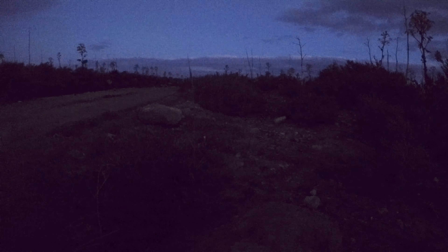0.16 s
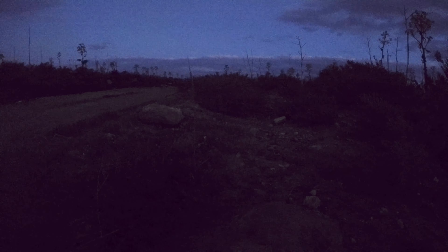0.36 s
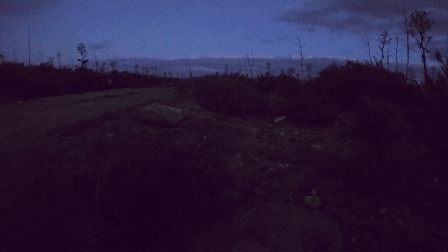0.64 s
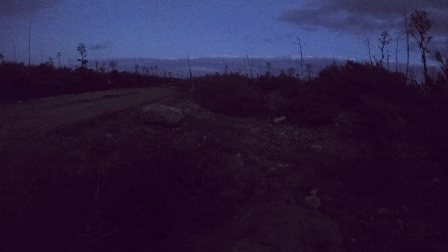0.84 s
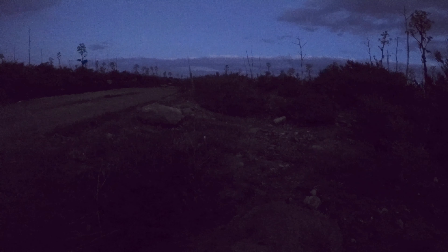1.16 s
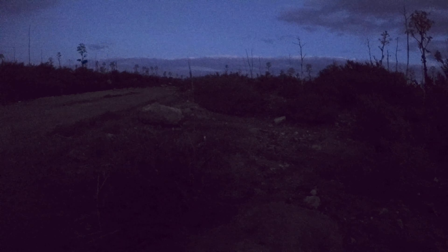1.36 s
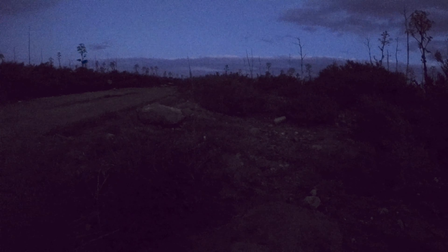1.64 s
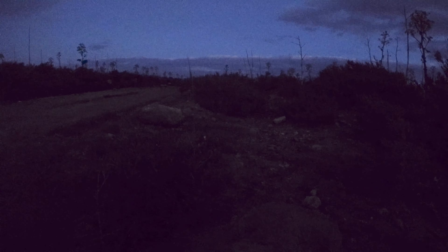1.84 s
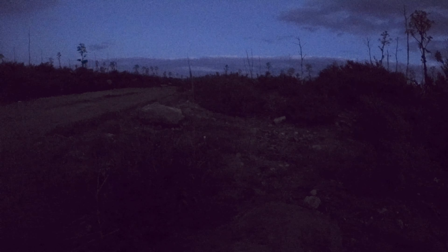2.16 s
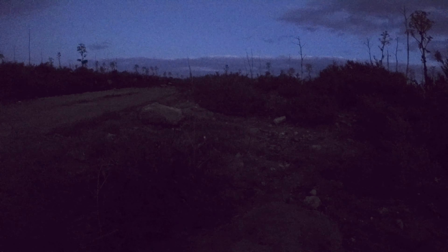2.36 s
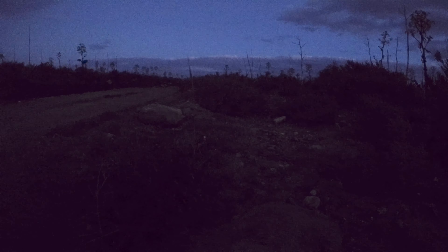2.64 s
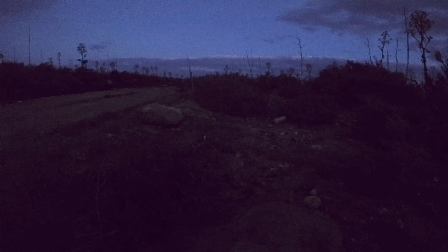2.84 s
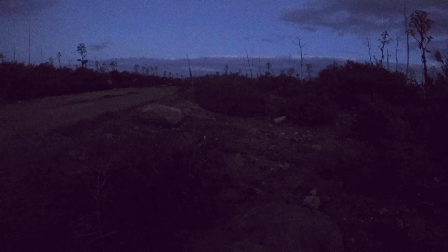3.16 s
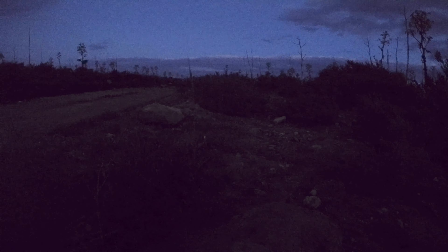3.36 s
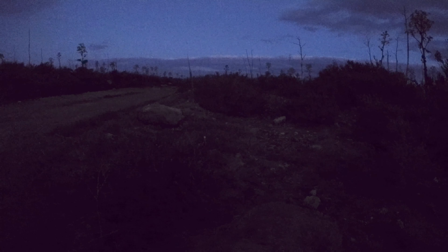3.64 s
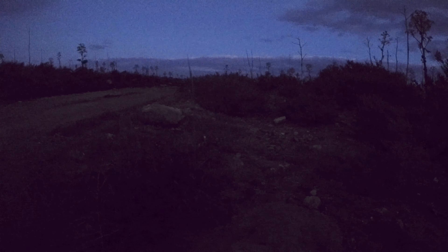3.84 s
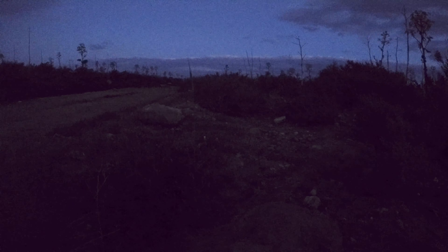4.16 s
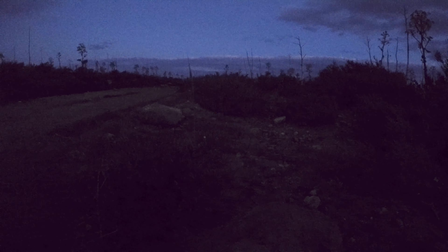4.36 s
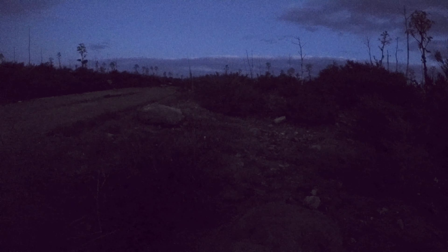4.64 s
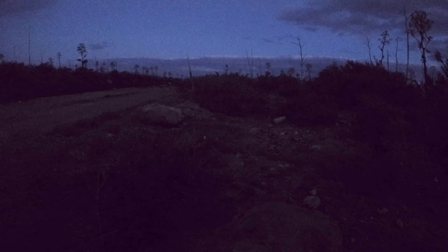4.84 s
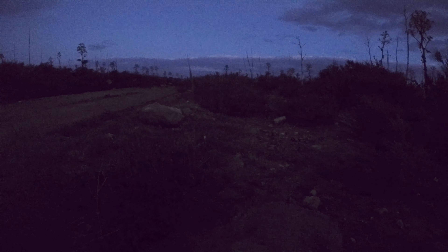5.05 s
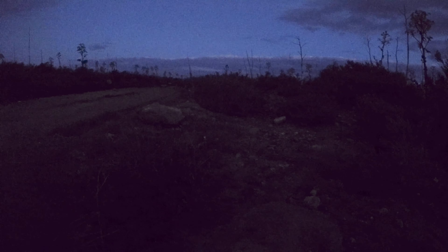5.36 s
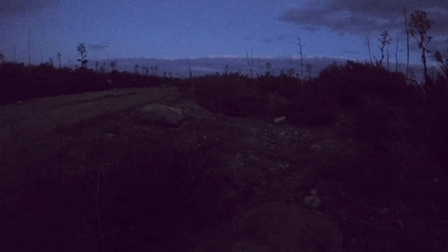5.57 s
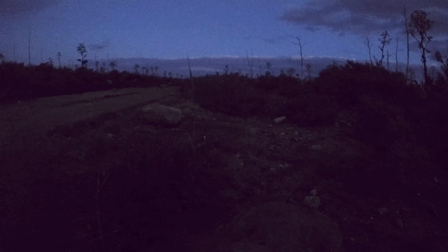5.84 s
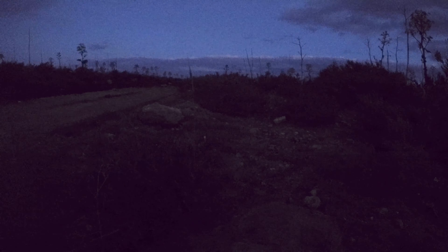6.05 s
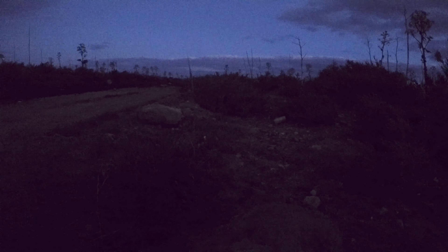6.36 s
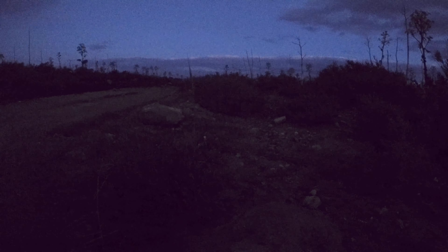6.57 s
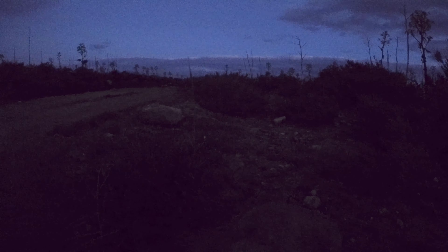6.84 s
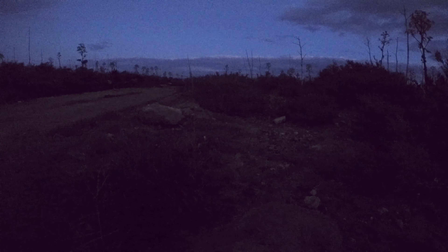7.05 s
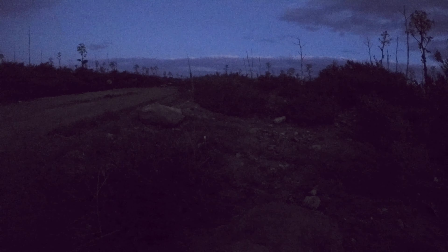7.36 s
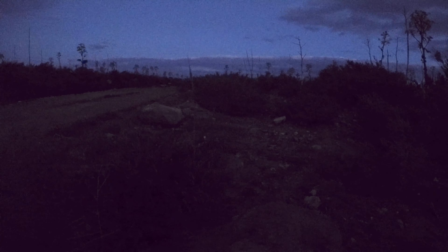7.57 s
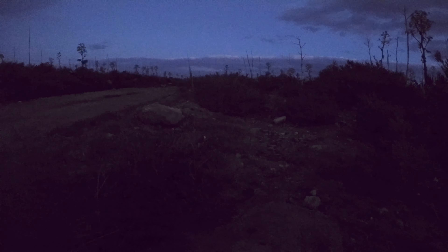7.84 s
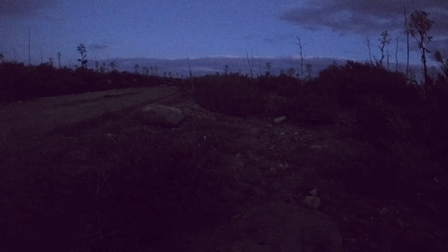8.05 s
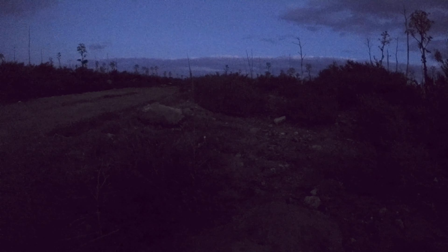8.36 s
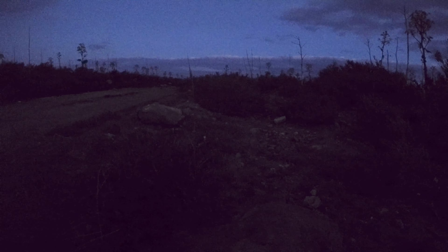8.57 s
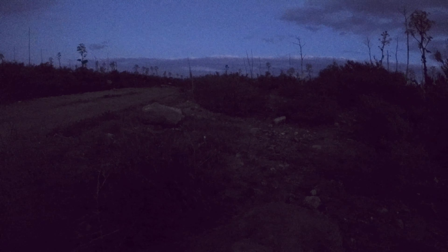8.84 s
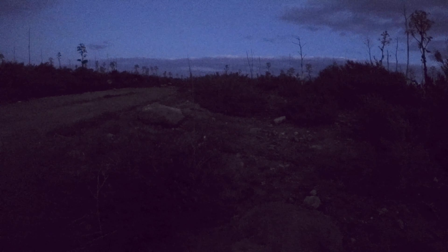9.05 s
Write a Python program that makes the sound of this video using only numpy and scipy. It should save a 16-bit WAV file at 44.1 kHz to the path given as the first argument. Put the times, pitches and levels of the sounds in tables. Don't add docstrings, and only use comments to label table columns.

```python
import sys
import numpy as np
from scipy import signal
from scipy.fft import rfft, irfft, next_fast_len
from scipy.io import wavfile
from scipy.ndimage import uniform_filter1d, minimum_filter1d

SR = 44100
rng = np.random.default_rng(int(sys.argv[2]) if len(sys.argv) > 2 else 0)


def amplitude_ratio(level_db):
    exponent = np.asarray(level_db, float) / 20
    return 10 ** exponent


def unload_audio(sound):
    columns = np.transpose(np.atleast_2d(sound))
    steps = np.round(np.clip(columns, -1, 1) * 32767)
    wavfile.write(sys.argv[1], SR, steps.astype(np.int16))


N = 405713


def evened(x):
    return x / np.sqrt(np.mean(x ** 2) + 1e-20)


def add(mix, s, sound):
    part = mix[..., round(s * SR):][..., :sound.shape[-1]]
    part += sound[..., :part.shape[-1]]


def curve(rows, t):
    s, *columns = np.transpose(rows)
    return [np.interp(t, s, c) for c in columns]


def resonate(x, hz, width):
    turn = np.exp(2j * np.pi * np.cumsum(hz * np.ones(len(x))) / SR)
    r = np.exp(-np.pi * width / SR)
    return 2 * (turn * signal.lfilter([1 - r], [1, -r], x / turn)).real


def ring(x, modes, order=2):
    size = next_fast_len(len(x) + 8192)
    hz = np.fft.rfftfreq(size, 1 / SR)
    gain = np.zeros((2, len(hz)), complex)
    for k, (mode_hz, width, db, side_db, phase) in enumerate(modes):
        shape = (-1) ** k * amplitude_ratio(db) / (1 + 2j * (hz - mode_hz) / width) ** order
        left, right = amplitude_ratio(side_db / 2), amplitude_ratio(-side_db / 2) * np.exp(1j * phase)
        gain += shape * np.array([[left], [right]])
    return irfft(rfft(x, size) * gain, size)[:, :len(x)]


STROKE_DB = -19


def swells(tops, level_db, rise, fall):
    t = np.arange(0, N / SR + .01, .002)
    late = t - np.reshape(tops, (-1, 1))
    away = np.maximum(late / np.reshape(fall, (-1, 1)), -late / np.reshape(rise, (-1, 1)))
    db = np.reshape(level_db, (-1, 1)) + STROKE_DB * away
    return np.interp(np.arange(N) / SR, t, np.sqrt((amplitude_ratio(db) ** 2).sum(0)))


# (mode_hz, width_hz, level_db, left_right_db, right_phase_rad)
RUB_MODES = [(358, 1100, -30, -1, 3.15), (593, 170, -0.5, -10.5, 2.27), (765.6, 73, -2.5, -9.5, 3.2),
             (850, 156, 4.5, -4, 3.38), (1130, 404, -3.5, -1, 3.78), (1355, 118, 1.5, -1, 3.826),
             (1460, 210, -5, 0.5, 4.15), (1970, 240, -21, -2.5, 3.89), (734.4, 25.6, -3.5, -5, 3)]
OPEN_HZ, RASP_PER_OCTAVE_DB = 1330, 14
RASP_RISE_S = .005
BARE_DB, BARE_SIDE_DB, BARE_PHASE = -17, -8.5, 1.95


def note(rows, arch, rough, rasp_bands, tail_ring_db=0):
    t = np.arange(rows[0][0], rows[-1][0], 1 / SR)
    effort_db, peak_hz = curve(rows, t)

    start_hz, top_hz, top, end_hz, rasp_db = arch
    u = np.linspace(0, 1, len(t))
    rise, fall = np.clip(u / top, 0, 1), np.clip((u - top) / (1 - top), 0, 1)
    hz = start_hz + (top_hz - start_hz) * np.sin(np.pi / 2 * rise) ** 2
    hz = hz - (top_hz - end_hz) * fall ** 0.71
    rough = np.minimum(rough * (1.8 - 1.55 * fall ** .4), 1)
    wobble = evened(uniform_filter1d(rng.standard_normal(len(t)), 150))
    turns = np.cumsum(hz * (1 + .16 * rough * wobble)) / SR

    pulses = sum(np.cos(2 * np.pi * k * turns) for k in range(1, 6))
    pulses = pulses - .55 * np.cos(2 * np.pi * turns)
    puffs = (0.32 + np.exp(-(turns % 1) / 0.3)) * rng.standard_normal(len(t))
    drive = (1 - rough) * evened(pulses) + 5 * rough * evened(puffs)
    drive = amplitude_ratio(-25.5) * drive + resonate(drive, peak_hz, 175)
    edge = np.clip(np.minimum(t - t[0], t[-1] - t) / .014, 0, 1) ** 1.4
    snap = np.clip(np.minimum((t - t[0] - .003) / RASP_RISE_S, (t[-1] - t) / 0.022), 0, 1)

    upper = np.array(rasp_bands)
    upper[:, 0] *= rng.uniform(.975, 1.025, len(rasp_bands))
    body, hoarse = np.array(RUB_MODES), rough.max() ** 4
    body[[1, -2], 2] += np.array([-2.0, 5.0]) * hoarse
    body[-1, 2] += tail_ring_db

    rub, rasp = ring(drive, body), ring(puffs, upper)
    drive *= amplitude_ratio(effort_db) / np.sqrt(uniform_filter1d(rub.mean(0) ** 2, 900) + 1e-9)
    mouth_db = RASP_PER_OCTAVE_DB * np.log2(peak_hz / OPEN_HZ)
    pitch_db = 8.4 * np.log2(np.where(fall > 0, hz / top_hz, 1))
    puffs *= amplitude_ratio(effort_db + rasp_db + mouth_db + pitch_db) / rasp.mean(0).std()

    tail = np.zeros(3600)
    bare = np.cos(2 * np.pi * turns + np.array([[0], [BARE_PHASE]]))
    bare = amplitude_ratio(effort_db + BARE_DB) * np.sqrt(fall) * (1 - rough) ** 2 * edge * bare
    bare = bare * amplitude_ratio(np.array([[BARE_SIDE_DB], [-BARE_SIDE_DB]]) / 2)
    bare = np.c_[bare, np.zeros((2, len(tail)))]
    return bare + ring(np.r_[drive * edge, tail], body) + ring(np.r_[puffs * snap, tail], upper)


# (time_s, rasp_re_effort_db)
RASPING = [(0, -19), (.5, -30), (1.1, -22), (1.5, -22), (2.6, -17.5), (4.2, -19)]
PIP_DB = -5
START_HZ, TOP_HZ, END_HZ = 435.6, 564.5, 299.4
FALL_S = .058
SHUT_HZ, OPENING_S = 780, 0.0285
RELEASE_S, PUSH_GAP_S = .02, .04
END_DB = -15.5
STRAIN_S, HOARSE_ROUGH = .095, .55


def call(start, length, effort_db, top, open_hz, rough, end_hz, extra_db, closing, rasp_bands, push):
    start_db, sag_db, last_db, tail_ring_db = push
    top = np.clip(top, .05, .9)
    top_s, end_s = start + top * length, start + length
    run_up = min(top * length / OPENING_S, 1)
    rows = [(start, effort_db + start_db * run_up, SHUT_HZ)]
    if top * length > 2 * OPENING_S:
        rows += [(top_s - OPENING_S, effort_db + start_db, SHUT_HZ)]
    rows += [(top_s, effort_db, open_hz)]
    last_s, narrow = end_s - RELEASE_S, open_hz - closing * (open_hz - SHUT_HZ)
    if last_s - top_s > PUSH_GAP_S:
        rows += [(last_s - PUSH_GAP_S / 2, effort_db + sag_db, narrow)]
        rows += [(last_s, effort_db + last_db, open_hz)]
    rows += [(end_s, effort_db + END_DB, narrow)]
    rasp_db = curve(RASPING, start)[0] + PIP_DB * (1 - run_up) + extra_db
    arch = START_HZ, TOP_HZ, max(top, 1 - FALL_S / length), end_hz, rasp_db
    rough = min(rough * max(length / STRAIN_S, 1), HOARSE_ROUGH)
    return start - .006, note(rows, arch, rough, rasp_bands, tail_ring_db)


# (start_s, length_s, effort_db, share_before_top, top_resonance_hz)
NOTES = [(0.686, .12, -20, 0.14, 1396), (0.937, 0.073, -18.5, 0.29, 1515), (1.114, 0.08, -19.5, 0.28, 1400),
         (1.226, 0.083, -18, 0.52, 1300), (1.428, 0.084, -18, 0.36, 1464),
         (1.606, 0.086, -19.5, 0.33, 1230), (1.725, 0.11, -16, 0.66, 1286),
         (1.959, 0.089, -19.5, 0.3, 1355), (2.144, 0.064, -17.5, 0.44, 1250), (2.27, 0.051, -19, 0.16, 830),
         (2.329, 0.13, -19, 0.53, 1163), (2.578, 0.099, -21, 0.21, 1300), (2.785, 0.064, -17.5, 0.41, 1080),
         (2.904, 0.047, -18.5, 0.1, 830), (2.959, 0.17, -19.5, 0.8, 1154),
         (3.261, 0.094, -18.5, 0.31, 1300), (3.477, 0.086, -19.5, 0.33, 1230),
         (3.598, 0.079, -18, 0.73, 1210), (3.818, 0.084, -18.5, 0.39, 1350),
         (4.001, 0.064, -18, 0.41, 1343)]
# (roughness, end_pitch_hz, rasp_db)
TIMBRE = [(0.22, 300, 2), (0.2, 150, -4.5), (0.35, 410, -5), (0.22, 295, 2.5), (0.2, 270, -2),
          (0.4, 490, -1), (0.2, 240, 3), (.16, 250, -2), (0.28, 270, 0), (0.4, 300, -1.5), (0.3, 370, 3.5),
          (0.4, 340, 0), (0.19, 301, 2), (0.35, 350, 0.5), (.22, 400, 2), (0.59, 270, 0), (0.3, 270, 1),
          (0.24, 303, 1.5), (0.16, 270, -1), (0.17, 276, -2.5)]
# (start_db, between_pushes_db, last_push_db, tail_ring_db)
PUSHES = [(1, -5, 2, -10), (-1, -7, 1, -4), (-5.5, -7, 1, -6), (-6, -7, 1, 3), (-6, -7, 1, 2),
          (-5, -7, 1, 12), (-6.5, -7, 1, -12), (-4.5, -4, -5, 5), (-9.5, -7, 1, 6.5), (-7, -7, 1, 3),
          (-5, -5, -1, -5), (-2, -4.5, 2, -14), (-9, -7, 1, 7.5), (-3, -7, 1, 0), (-4, -6, 6.5, -14),
          (-2.5, -10, 2, -3), (-3.5, -6, -6, 4), (-3.5, -7, 1, -5), (-5, -4, -5, 4), (-7, -7, 1, -1)]
# (band_hz, width_hz, level_db, left_right_db, right_phase_rad)
RASP = [(3210, 770, -7.5, 0, 4.5), (4234, 610, -4, -6.5, 1.5), (5180, 360, -8, -3.5, 1.1),
        (5836, 464, 1.5, -4, 1.26), (7950, 880, -17, -5, 1.5), (9800, 680, -22.5, 3, -5)]


def clear_notes(rub):
    for row, timbre, push in zip(NOTES, TIMBRE, PUSHES):
        add(rub, *call(*row, *timbre, 0.53, RASP, push))


# (start_s, length_s, effort_db, share_before_top, top_resonance_hz)
HOARSE = [
    (.139, 0.11, -24, 0.04, 780),
    (0.231, 0.053, -16.5, 0.49, 1330),
    (0.432, .112, -19.5, 0.14, 1560),
    (4.125, 0.053, -28.5, 0.21, 850),
]
HOARSE_RASP_DB = [2.4, 0.61, -0.79, 0]
# (band_hz, width_hz, level_db, left_right_db, right_phase_rad)
EARLY_RASP = [(2690, 2100, -1, 2, 4.2), (3840, 980, 3, 2.5, 4.7), (5200, 890, -3.5, -6, 1.5),
              (6340, 450, -3.5, -8, 1.2), (7900, 1600, -8.5, -4, 1.1)]
GRUNT_RASP = [(3240, 360, -1.5, 1, 4), (4370, 550, -1, -11, 2), (4970, 460, 1, -10, 0.89),
              (6150, 650, -4.5, -8, 2.4), (7340, 900, -13, -6, 1.5)]


def hoarse_notes(rub):
    rasp_sets = EARLY_RASP, EARLY_RASP, RASP, GRUNT_RASP
    push = -6, -3, 1, 0
    for row, rasp_bands, rasp_db in zip(HOARSE, rasp_sets, HOARSE_RASP_DB):
        add(rub, *call(*row, HOARSE_ROUGH, END_HZ, rasp_db, 0.36, rasp_bands, push))


# (time_s, effort_db, resonance_hz)
GRUNT = [
    (.024, -23, 800),
    (.042, -25, 820),
    (.066, -24.5, 770),
    (.085, -26.5, 740),
    (.122, -39, 754),
]
# start_hz, top_hz, share_before_top, end_hz, rasp_db
GRUNT_ARCH = (475.5, 526, 0.1, 321, -21.5)
# (time_s, effort_db, resonance_hz)
GRUNT_TOP = [
    (.03, -31, 1500),
    (.042, -27.5, 1750),
    (.07, -31, 1400),
]
GROAN_ROUGH = .7


def grunt(rub):
    add(rub, GRUNT[0][0], note(GRUNT, GRUNT_ARCH, HOARSE_ROUGH, GRUNT_RASP))
    add(rub, GRUNT_TOP[0][0], note(GRUNT_TOP, GRUNT_ARCH, GROAN_ROUGH, GRUNT_RASP))


# (time_s, level_db)
GROAN_NOISE = [
    (4.185, -57),
    (4.27, -54.5),
    (4.31, -41),
    (4.37, -44.5),
    (4.39, -68.5),
]
# (start_hz, end_hz, width_hz, level_db, left_right_db, right_phase_rad)
GROAN_BANDS = [(794, 1790, 270, 19.5, -3, 3.9), (3180, 3300, 360, -5, 5, 4.2),
               (3900, 4200, 600, -6, -5, 1.5), (4660, 5300, 730, 0, -9, 4.2),
               (6140, 5760, 500, -15, 1, 1.2), (7750, 8000, 990, -6, -4, 1.5)]


def groan_rasp():
    t = np.arange(GROAN_NOISE[0][0], GROAN_NOISE[-1][0], 1 / SR)
    breath = amplitude_ratio(curve(GROAN_NOISE, t)[0])
    slide, out = np.linspace(0, 1, len(t)) ** 1.76, 0
    for start_hz, end_hz, width, db, side_db, phase in GROAN_BANDS:
        hz = start_hz + (end_hz - start_hz) * slide
        band = resonate(rng.standard_normal(len(t)), hz, width)
        band = evened(resonate(band, hz, width))
        out = out + ring(band * breath, [(end_hz, 4 * width, db, side_db, phase)], order=1)
    return t[0], out


# (time_s, effort_db, brightest_resonance_hz)
GROAN = [
    (4.19, -22.5, 850),
    (4.216, -32, 664),
    (4.242, -29.5, 784),
    (4.282, -24, 637),
    (4.345, -28, 920),
    (4.364, -17.5, 1630),
    (4.385, -38.5, 835),
    (4.41, -28, 700),
    (4.426, -53, 603),
]
# start_hz, top_hz, share_before_top, end_hz, rasp_db
GROAN_ARCH = (331.5, 697.5, 0.94, 529, -31)


def groan(rub):
    add(rub, *groan_rasp())
    add(rub, GROAN[0][0], note(GROAN, GROAN_ARCH, GROAN_ROUGH, RASP))


def limited(x):
    gain = np.minimum(0.73 / (abs(x).max(0) + 1e-9), 1)
    return x * uniform_filter1d(minimum_filter1d(gain, size=161), size=161)


def calls():
    rub = np.zeros((2, N))
    hoarse_notes(rub)
    clear_notes(rub)
    grunt(rub)
    groan(rub)
    return limited(rub)


def blow(modes, length, order=2, bounce=0.11):
    t = np.arange(6000) / SR
    modes = np.array(modes)
    modes[:, 0] *= 1 + .016 * rng.standard_normal(len(modes))
    modes[:, 2] += 1.4 * rng.standard_normal(len(modes))
    modes[:, 4] += .6 * rng.standard_normal(len(modes))
    later = rng.uniform(.004, .022, 2)
    bounces = sum((t > s) * np.exp(-abs(t - s) / length) for s in later)
    grip = np.exp(-t / length) + bounce * bounces
    contact = (1.35 + rng.standard_normal(len(t))) * grip * np.minimum(t / 0.0011, 1)
    out = ring(contact, modes, order=order)
    return out / abs(out.mean(0)).max()


# (time_s, peak_db, hardness_db)
KNOCKS = [
    [(5.16, -26.5, -35), (5.172, -22, -6.5), (5.217, -23.5, -49), (5.283, -25, -49), (5.328, -17, -16),
     (5.395, -29, -23), (5.441, -17.5, -20), (5.452, -29, -7), (5.462, -32, -13), (5.514, -17, -9.5),
     (5.632, -28, -27), (5.642, -13.5, -33), (5.671, -22, -28), (5.688, -18, -31), (5.75, -38, -18.5),
     (5.806, -23.5, -21), (5.82, -19.5, -30), (5.872, -40.5, -12), (5.947, -14.5, -18.5),
     (5.965, -27.5, -19), (5.98, -15.5, -15), (6.019, -19.5, -22), (6.033, -41, -14), (6.083, -25, -8),
     (6.09, -19.5, -11.5), (6.11, -15.5, -20), (6.145, -18, -27), (6.198, -23, -18), (6.221, -14.5, -23)],
    [(6.44, -33.5, -21), (6.495, -22, -28), (6.522, -21.5, -19), (6.628, -17.5, -21.5), (6.687, -28, -16.5),
     (6.759, -18, -17), (6.781, -20.5, -28.5), (6.828, -13.5, -18.5), (6.901, -16, -23.5),
     (6.923, -13, -28), (7.062, -25, -4.5), (7.192, -30, -30)],
]
LATE_KNOCKS = [(7.837, -40.5, -9), (7.902, -35, -21), (7.923, -25, -16), (7.963, -21, -20),
               (7.975, -23.5, -7.5), (8.001, -22.5, -22), (8.018, -24, -17), (8.03, -29, -15),
               (8.045, -26.5, -1), (8.158, -14.5, -13.5), (8.218, -25, -21), (8.241, -17.5, -21),
               (8.297, -22.5, -13), (8.384, -21, -16), (8.391, -16, -32), (8.485, -32.5, -14),
               (8.505, -37.5, -11), (8.625, -38, -40)]
# (mode_hz, width_hz, level_db, left_right_db, right_phase_rad)
SHELL = [(506, 99, -1, -8.5, 3.89), (662.3, 68, 8, -7.5, 2.87), (830, 142, -5, -9, 2.97)]
PLATE = [(1022, 215, -1.5, 0.9, 3.44), (1170, 256, -6.5, 0.89, 4.57), (1400, 145, -5.5, -1.7, 4)]
RIM = [(1888, 420, 7.5, -1, 4.15), (2590, 700, -14.5, -2.5, 5.23)]
PLATE_SHARE = 0.41


def knocks():
    out = np.zeros((2, N))
    for s, db, rim_db in sum(KNOCKS, LATE_KNOCKS):
        shell = np.array(SHELL)
        shell[0, 2] -= 0.34 * (rim_db + 33.5)
        rings = blow(shell, 0.0059)
        rings = rings + amplitude_ratio(PLATE_SHARE * rim_db) * blow(PLATE, 0.0033)
        rings = rings + amplitude_ratio(rim_db) * blow(RIM, 0.0054, bounce=0)
        add(out, s - .003, amplitude_ratio(db) * rings)
    return signal.sosfilt(signal.butter(2, 3600, fs=SR, output="sos"), out)


# (time_s, peak_db, top_mode_share_db)
TICKS = [(5.335, -52, -11), (5.513, -46, -7), (5.667, -54, -10), (5.948, -52, -7), (5.964, -51, -8),
         (5.982, -47.5, -7.5), (6.034, -53.5, -8), (6.092, -47, -4), (6.112, -44.5, -7), (6.146, -56, -11),
         (6.219, -40.5, -6), (6.759, -45, -16), (6.828, -45, -14), (6.901, -51.5, -15.5), (6.928, -49, -5),
         (6.934, -58, -2), (7.063, -43, -6.5), (7.965, -54, -6), (8.046, -48, -12), (8.158, -45.5, -9),
         (8.24, -44, -8)]
# (mode_hz, width_hz, level_db, left_right_db, right_phase_rad)
EDGE = [(3220, 670, 4, 8.5, 4.9), (4190, 1100, 0, -1, 4.7), (5920, 1500, -4, -6.5, 1.3)]


def ticks():
    out = np.zeros((2, N))
    for s, db, top_db in TICKS:
        tick = blow(EDGE[:2], 0.0057, bounce=0) + amplitude_ratio(top_db) * blow(EDGE[2:], 0.0038, bounce=0)
        add(out, s - .003, amplitude_ratio(db) * tick)
    return out


# (time_s, peak_db, upper_mount_mode_share_db)
THUMPS = [(0.156, -21.5, -1), (0.186, -23.5, -0.5), (0.282, -12, -8.5), (0.464, -28, -3.5),
          (1.313, -29.5, -16), (4.286, -30, 1), (4.4, -28.5, 3.5), (5.183, -31.5, 7), (5.338, -17.5, -5),
          (5.4, -28.5, -6), (5.456, -20.5, -4.5), (5.677, -17.5, -1), (5.835, -14, -4),
          (5.963, -15.5, -5.5), (5.985, -12.5, -2.5), (6.108, -22.5, 6), (6.135, -25.5, -3),
          (6.228, -13.5, -7), (6.249, -21, -8.5), (6.47, -27.5, -3.5), (6.641, -16, -7),
          (6.783, -13, -10.5), (6.81, -21.5, -7), (6.847, -15, 0), (6.878, -16.5, -14), (6.922, -10, -13),
          (6.949, -13.5, -16), (7.073, -16, -4.5), (7.094, -20, -10.5), (7.941, -30, 4), (7.986, -22, 3),
          (8.05, -25.5, -6), (8.173, -21.5, -1.5), (8.223, -19.5, 2), (8.398, -24.5, 7), (8.422, -22.5, -4),
          (8.5, -36, 2)]
# (mode_hz, width_hz, level_db, left_right_db, right_phase_rad)
MOUNT_LOW = [(148, 26.6, -5, -16.5, -1.5), (178.5, 23, 1, -9, 0.14)]
MOUNT_HIGH = [(203.2, 29.8, 2.5, 1.1, -1.5), (313, 480, -17.5, 3.8, 10.5)]


def thumps():
    out = np.zeros((2, N))
    band = signal.butter(3, [105, 360], "band", fs=SR, output="sos")
    for s, db, high_db in THUMPS:
        rock = blow(MOUNT_LOW, 0.00032, bounce=0.2)
        rock = rock + amplitude_ratio(high_db) * blow(MOUNT_HIGH, 0.00048, bounce=0.46)
        add(out, s - .017, amplitude_ratio(db) * signal.sosfilt(band, rock))
    return out


# (top_s, level_db, rise_s, fall_s)
BRUSH = [(.3, -44, 0.073, 0.12), (0.431, -32.5, 0.13, 0.2), (1.218, -32, 0.071, 0.17),
         (2.731, -43, 0.032, 0.033), (4.051, -36.5, 0.17, 0.37), (5.372, -42, 0.27, 0.28),
         (5.67, -45, 0.026, 0.035), (5.817, -34.5, 0.11, 0.23), (5.999, -30, 0.038, 0.29),
         (6.12, -39, 0.3, 0.5), (6.53, -43, .6, 0.23), (6.839, -32, 0.17, 0.095), (7.0, -42.5, 0.071, 0.46),
         (7.8, -48, 0.79, 0.15), (8.022, -27.5, 0.14, 0.051), (8.26, -35.5, 0.16, 0.31)]
SCRAPES = [(.19, -37, 0.037, 0.068), (.42, -44.5, 0.11, 0.059), (1.2, -46, 0.045, 0.09),
           (5.971, -49, 0.053, 0.064), (6.034, -51.5, 0.036, 0.027), (6.09, -50, .04, 0.067),
           (6.79, -51, 0.055, 0.045), (6.91, -54, 0.034, 0.045), (7.975, -53, 0.054, 0.023),
           (8.04, -58, 0.023, 0.028), (8.245, -38.5, 0.027, 0.085), (8.31, -59, 0.048, .1),
           (8.39, -41, 0.086, 0.019)]
GRAZES = [
    (5.25, -56, 0.13, 0.076),
    (7.35, -48, 0.17, 0.1),
    (7.63, -42, .15, 0.13),
    (7.84, -44, 0.11, 0.1),
]


def brush():
    slips = amplitude_ratio(3.2 * np.minimum(rng.exponential(1, N), 5)) * rng.choice([-1, 1], N)
    slips = slips * (rng.random(N) < 2200 / SR)

    def damped(modes):
        return ring(slips, np.array(modes) * [0.996, 1.2, 0.78, 0.89, 0.96])

    plate, rim = damped(PLATE), damped(RIM)
    body = damped(SHELL) + amplitude_ratio(-2.0) * plate + amplitude_ratio(-25.5) * rim
    body /= body.mean(0).std()
    body += amplitude_ratio(0.5) * evened(damped(MOUNT_LOW + MOUNT_HIGH))
    scrape = evened(rim + amplitude_ratio(9.0) * plate)
    strokes = swells(*np.transpose(BRUSH)) * body
    scrapes = amplitude_ratio(3) * swells(*np.transpose(SCRAPES)) * scrape
    grazes = amplitude_ratio(5.0) * swells(*np.transpose(GRAZES)) * evened(plate)
    return strokes + scrapes + grazes


def wind_on(t):
    start_s, rise_s, still_db = 0.18, 0.09, -18.5
    return amplitude_ratio(still_db * (1 - np.clip((t - start_s) / rise_s, 0, 1)))


def slow_noise(width):
    return evened(uniform_filter1d(uniform_filter1d(rng.standard_normal(N), width), width))


def low_noise(low_hz, high_hz, own):
    band = signal.butter(2, [low_hz, high_hz], "band", fs=SR, output="sos")
    noise = signal.sosfilt(band, rng.standard_normal((3, N)))
    return noise[0] + own * noise[1:]


# (widest_swing_s, level_db)
SWAY = [(.36, -27), (0.53, -21.5), (.68, -38.5), (.95, -43), (1.15, -34.5), (1.351, -22.5), (1.6, -27),
        (1.85, -40.5), (2.25, -33.5), (2.75, -33), (2.95, -30), (3.25, -29), (3.447, -27), (3.75, -28.5),
        (3.95, -29.5), (4.149, -33), (4.38, -14.5), (4.699, -29), (4.902, -33.5), (5.2, -31.5), (5.45, -29),
        (5.8, -31), (6.1, -36), (6.5, -34), (6.799, -26), (7.101, -22), (7.3, -28.5), (7.6, -30.5),
        (7.78, -44), (7.998, -18.5), (8.28, -19.5), (8.5, -36), (8.68, -30), (9.0, -53)]
# (top_s, level_db, rise_s, fall_s)
GUSTS = [(.45, -51, 0.11, .2), (1.35, -39, 0.27, 0.26), (2, -49, 0.45, .3), (3.3, -50.5, .4, 0.36),
         (4.4, -47.5, 0.28, 0.7), (5.05, -45, .3, 0.33), (6.3, -44, 0.38, .3), (7.1, -46, 0.47, 0.22),
         (8, -39, .3, 0.45), (8.45, -36, 0.44, 0.32), (8.98, -45, .2, .2)]
SWAY_HZ = 26.1
SWING_UP_S, SWING_DOWN_S = 0.24, 0.39


def sway():
    wind = wind_on(np.arange(N) / SR)
    swing = swells(*np.transpose(SWAY), SWING_UP_S, SWING_DOWN_S)
    swing = swing * wind * amplitude_ratio(-4 + 3 * slow_noise(2400))
    drift = slow_noise(3500)
    tone = np.sqrt(2) * np.sin(2 * np.pi * np.cumsum(SWAY_HZ * (1 + 0.062 * drift)) / SR)
    rumble = evened(low_noise(30, 75, 0.2))
    puffs = amplitude_ratio(5 * slow_noise(1500))
    lumps = swells(*np.transpose(GUSTS)) * wind * evened(low_noise(45, 110, .6) * puffs)
    return (swing * (tone + amplitude_ratio(-16.0) * rumble) + lumps) * amplitude_ratio(np.array([[-2.2], [1.8]]))


# (start_s, level_db, from_hz, to_hz)
CHIRPS = [
    (4.645, -60, 3480, 3130),
    (5.525, -65, 3050, 3430),
    (9.151, -61.5, 3200, 3400),
]
CHIRP_S = 0.076


def bird():
    out, t = np.zeros((2, N)), np.arange(0, CHIRP_S, 1 / SR)
    for s, db, from_hz, to_hz in CHIRPS:
        turns = np.cumsum(from_hz + (to_hz - from_hz) * t / CHIRP_S) / SR
        whistle = np.sin(2 * np.pi * turns + np.array([[0], [1.5]]))
        add(out, s, amplitude_ratio(db) * np.hanning(len(t)) * whistle)
    return out


# (frequency_hz, density_db_per_hz)
AIR = [(40, -62.5), (100, -72), (200, -71.5), (320, -81), (1000, -82), (4000, -101), (9000, -100),
       (11000, -103), (13000, -110), (15000, -122)]
# (frequency_hz, likeness, left_right_db, right_phase_rad)
PORTS = [(60, 0.6, -4.5, .1), (168, 0.22, -8, .1), (344, 0.2, 0, 2.9), (700, 0.84, -4, 2.9),
         (1300, 0.75, 1, 3.05), (3200, 0.6, 0.5, 4.84), (8000, 0.1, -7.5, 5.9), (12600, .05, -3, 3.8)]
AIR_DB = -42


def air():
    frames, hz = N // 256 + 5, np.fft.rfftfreq(1024, 1 / SR)
    a, b, c, d, patches = rng.standard_normal((frames, 513, 5)).T
    patches = evened(uniform_filter1d(uniform_filter1d(patches, 12, 0), 14, 1))

    def read(table):
        at_hz, *columns = np.transpose(table)
        return [np.interp(np.log(hz + 1), np.log(at_hz + 1), v)[:, None] for v in columns]

    same, side_db, phase = read(PORTS)
    same, left = np.clip(same, 0, 1), a + 1j * b
    right = same * left * np.exp(1j * phase) + np.sqrt(1 - same ** 2) * (c + 1j * d)
    z = np.array([left * amplitude_ratio(side_db / 2), right * amplitude_ratio(-side_db / 2)])
    z *= amplitude_ratio(read(AIR)[0] + 1.8 * patches)
    z[:, hz < 130] *= wind_on(np.arange(frames) * 256 / SR)
    return amplitude_ratio(AIR_DB) * evened(signal.istft(z, nperseg=1024, noverlap=768)[1][:, :N])


def over(power_db, limit_db, recover_db):
    fall = np.arange(N) * recover_db / SR
    held_db = np.maximum.accumulate(power_db + fall) - fall
    return uniform_filter1d(np.maximum(held_db - limit_db, 0), 300)


def scene():
    near = calls() + knocks() + ticks() + thumps()
    power_db = 10 * np.log10(abs(uniform_filter1d((near ** 2).max(0), 600)) + 1e-12)
    quick_db = 0.82 * over(power_db, -13.5, 35.0)
    slow_db = 1.14 * over(power_db, -13.0, 6.75)
    return near + sway() + (air() + brush() + bird()) / amplitude_ratio(quick_db + slow_db)


def band_limit(x):
    return signal.sosfilt(signal.butter(12, 14890, fs=SR, output="sos"), x)


def record(dry):
    soft = dry / (1 + abs(dry / 1.05) ** 10) ** (1 / 10)
    return band_limit(soft)


dry = scene()
out = record(dry)
unload_audio(out)
```